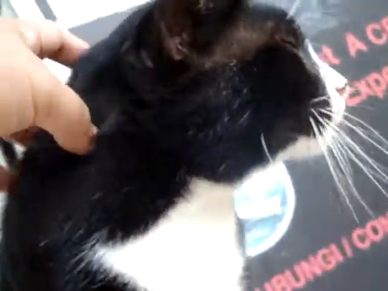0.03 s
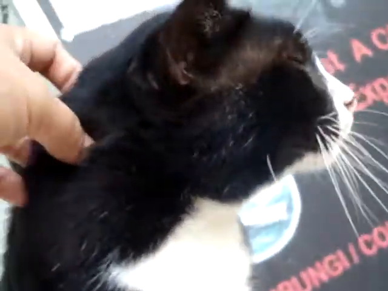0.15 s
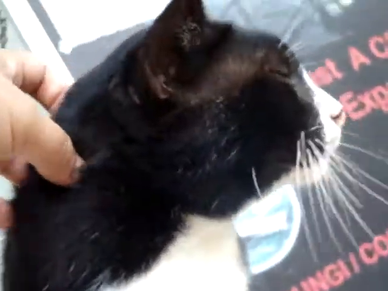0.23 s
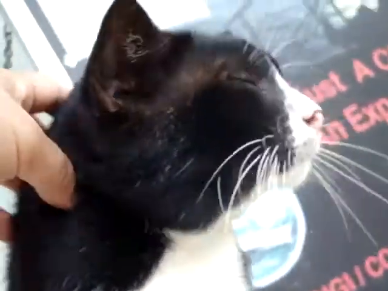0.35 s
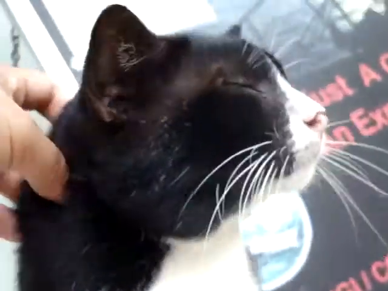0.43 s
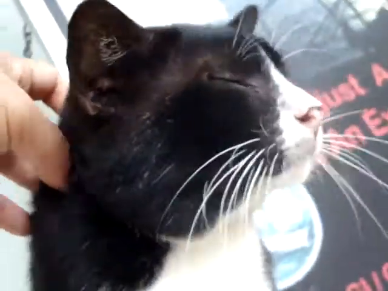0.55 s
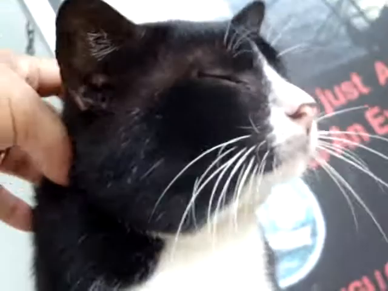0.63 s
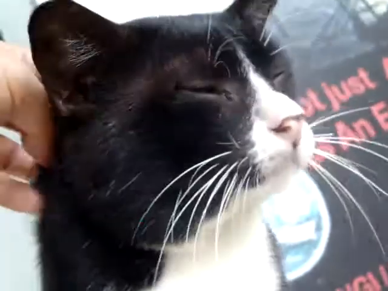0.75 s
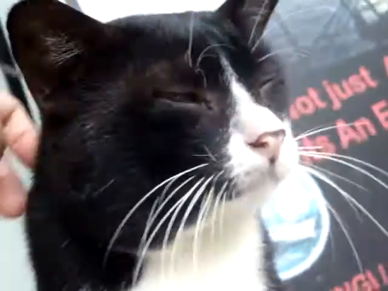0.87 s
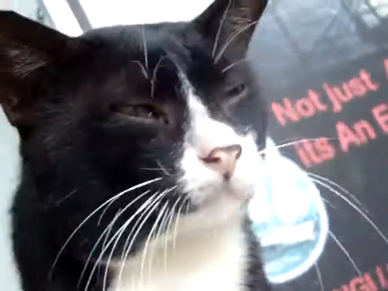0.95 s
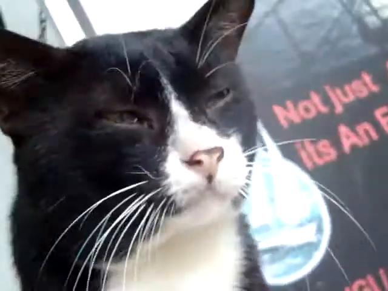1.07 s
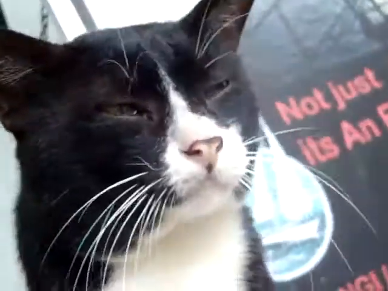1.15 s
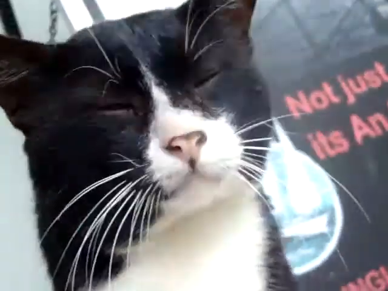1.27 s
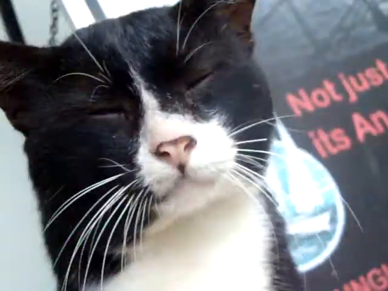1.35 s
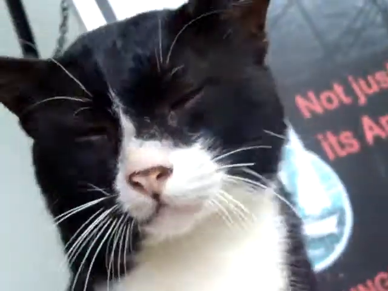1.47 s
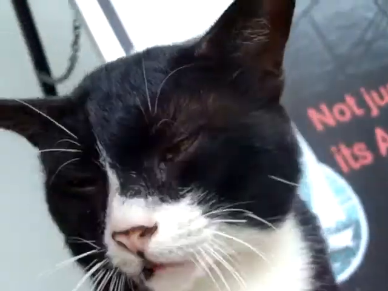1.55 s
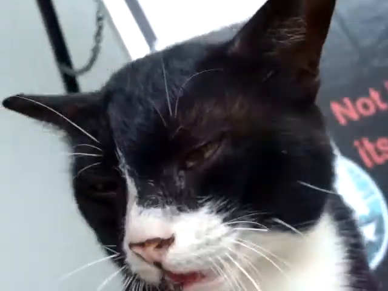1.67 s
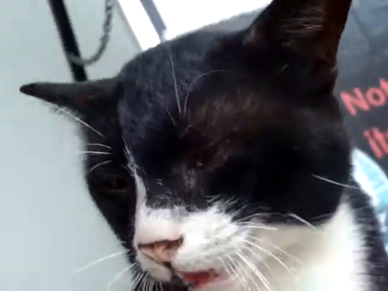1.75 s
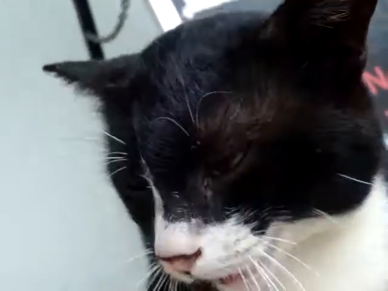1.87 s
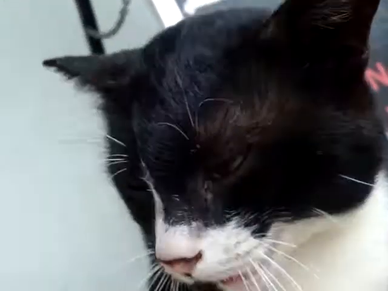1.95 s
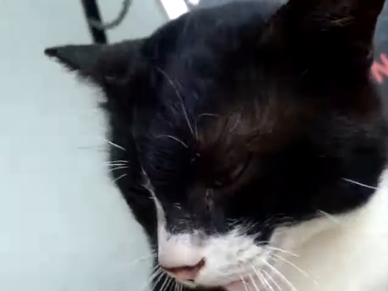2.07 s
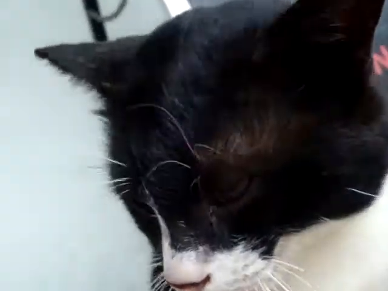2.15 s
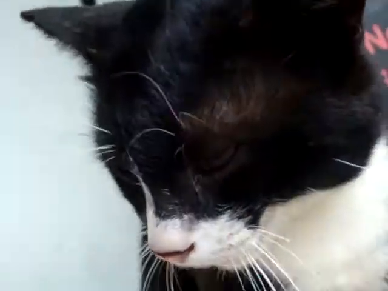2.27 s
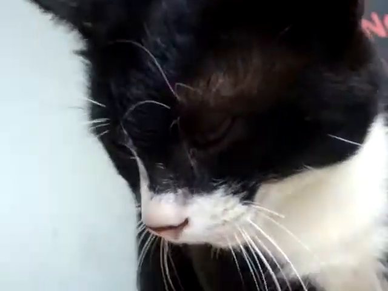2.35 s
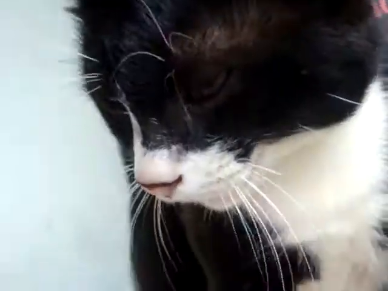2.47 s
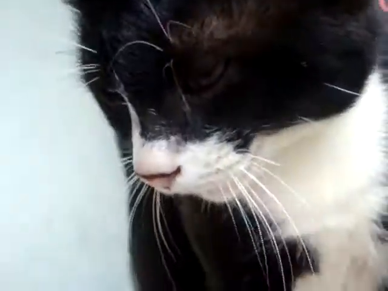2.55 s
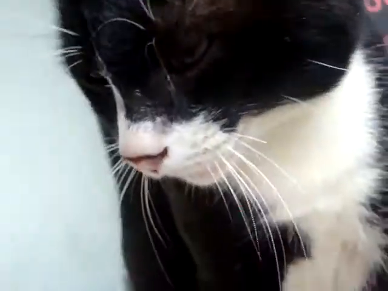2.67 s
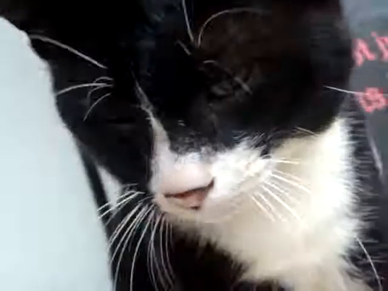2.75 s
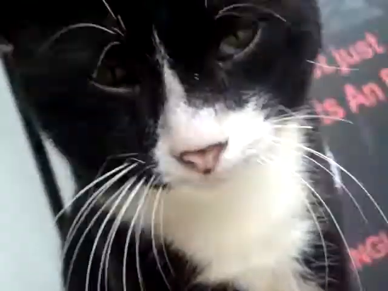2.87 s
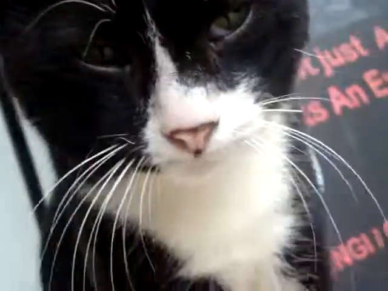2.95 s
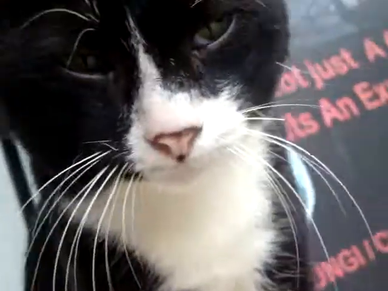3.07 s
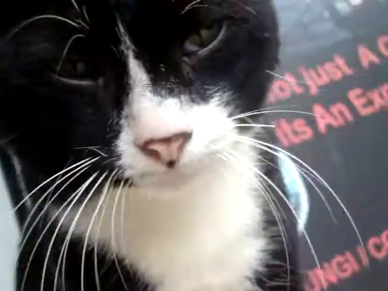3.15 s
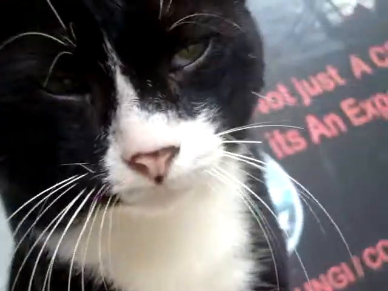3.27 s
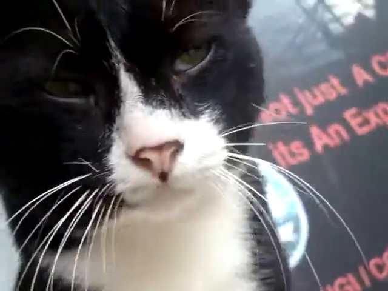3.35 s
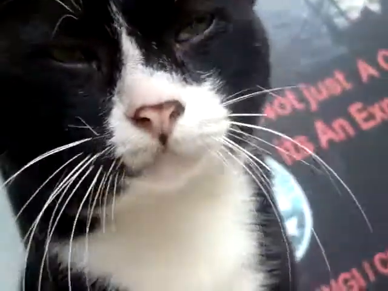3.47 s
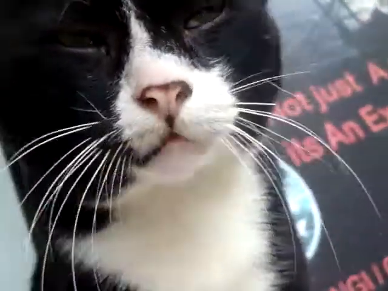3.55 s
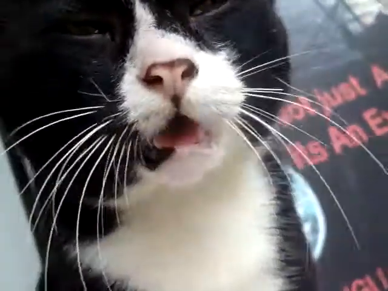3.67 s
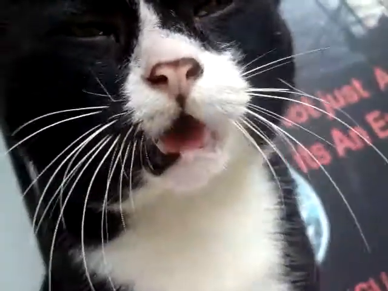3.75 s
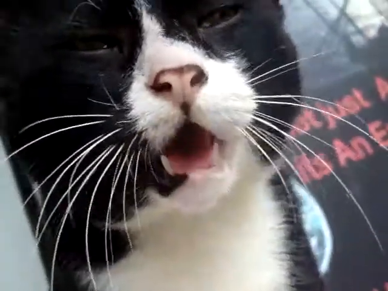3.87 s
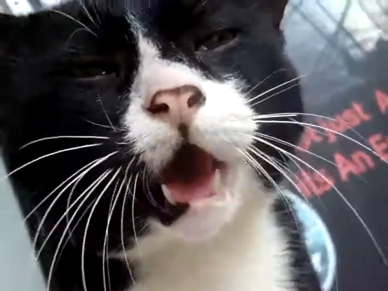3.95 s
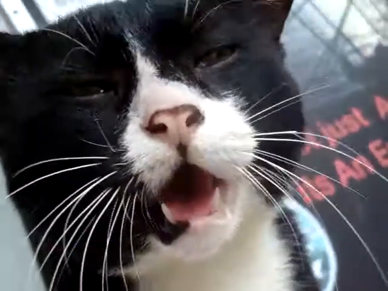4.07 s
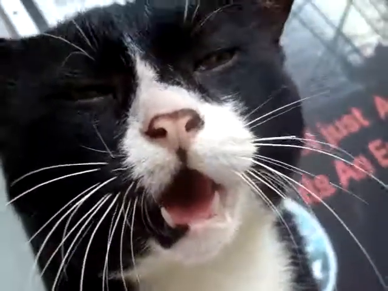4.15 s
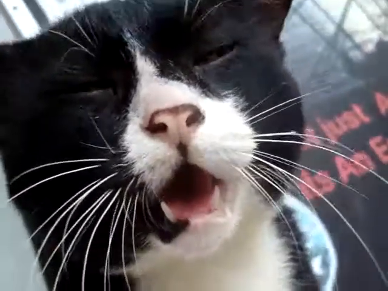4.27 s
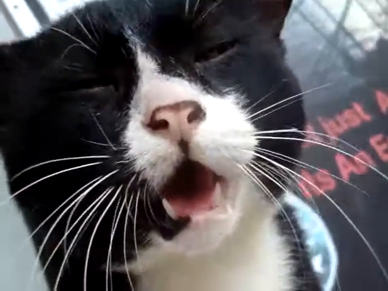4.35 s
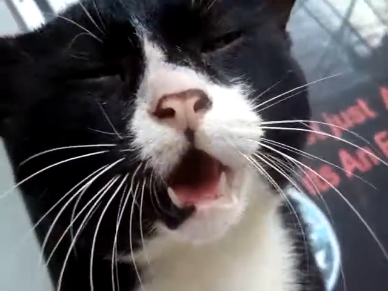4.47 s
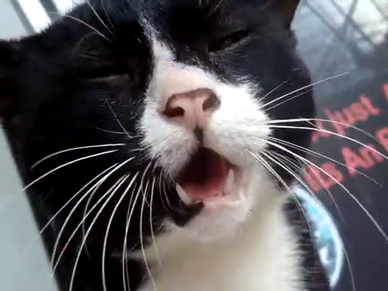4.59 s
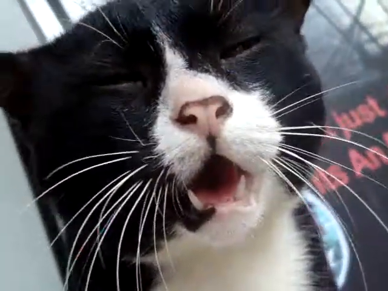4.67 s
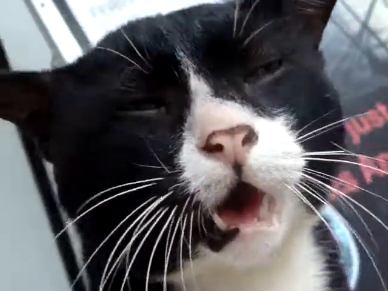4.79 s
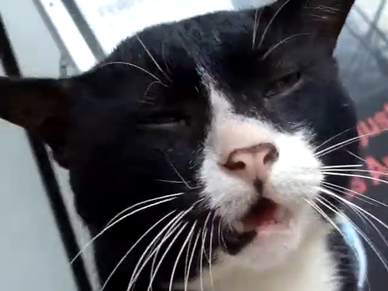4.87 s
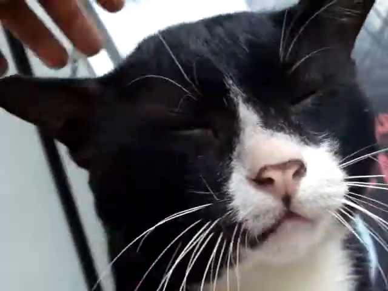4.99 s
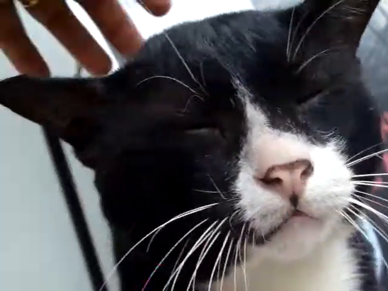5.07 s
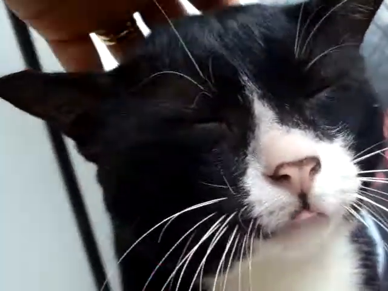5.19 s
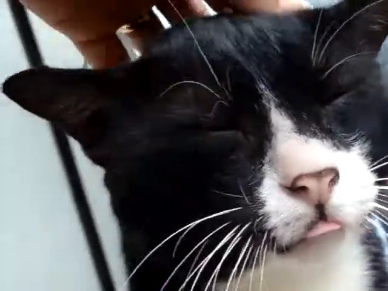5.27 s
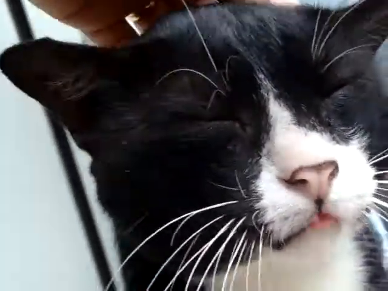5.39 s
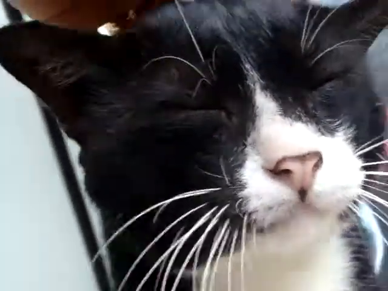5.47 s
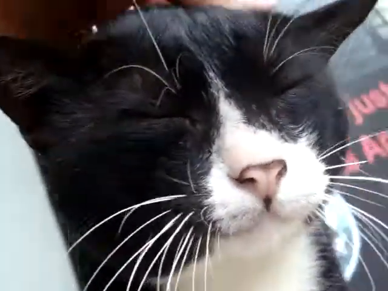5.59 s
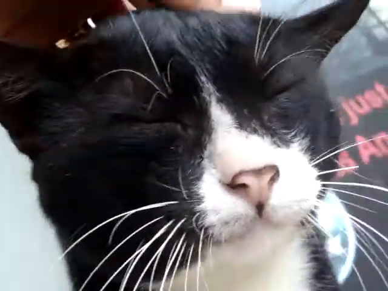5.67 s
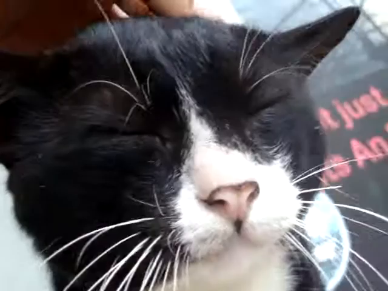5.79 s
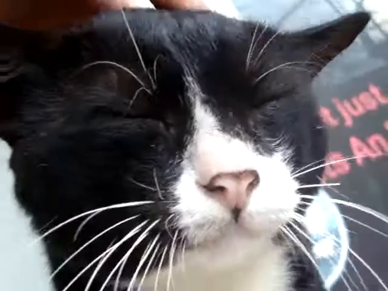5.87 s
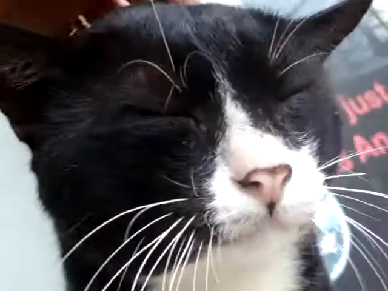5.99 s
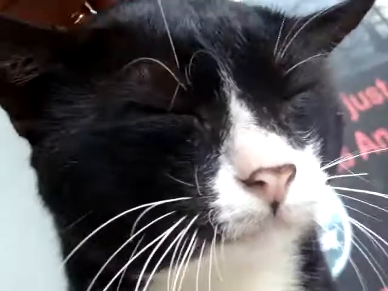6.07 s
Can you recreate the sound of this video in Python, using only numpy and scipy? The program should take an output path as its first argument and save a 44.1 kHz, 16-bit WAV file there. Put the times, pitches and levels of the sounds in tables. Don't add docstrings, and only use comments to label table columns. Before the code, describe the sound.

A cat close by gives two long, plaintive meows beside a street while a small motorbike putters, rolls away, and distant traffic murmurs.

```python
import sys
import numpy as np
from scipy import signal
from scipy.fft import rfft, irfft
from scipy.io import wavfile
from scipy.ndimage import uniform_filter1d

SR = 44100
rng = np.random.default_rng(int(sys.argv[2]) if len(sys.argv) > 2 else 0)


def level_to_linear(level):
    exponent = np.asarray(level, float) / 20
    return 10 ** exponent


def inscribe(sig):
    pcm = np.round(np.clip(np.atleast_2d(sig).T, -1, 1) * 32767)
    wavfile.write(sys.argv[1], SR, pcm.astype(np.int16))


N = 270465

# start in seconds, end in seconds.
CALL_SPANS_S = [
    (1.474, 2.603),
    (3.719, 4.86),
]
BREAK_S, BREAK_GLIDE_S = 3.842, .014


def level(x, db):
    return x * level_to_linear(db) / np.sqrt(np.mean(x ** 2))


def curves(rows):
    s, *columns = np.transpose(rows)
    return [np.interp(np.arange(N) / SR, s, c) for c in columns]


def colour(points, hz):
    f, db = np.transpose(points)
    return np.interp(np.log(hz), np.log(f), db)


def band(x, hz, width_hz):
    return signal.lfilter(*signal.iirpeak(hz, hz / width_hz, SR), x)


def walk(rate_hz):
    hold = int(SR / rate_hz)
    steps = np.repeat(rng.standard_normal(N // hold + 1), hold)
    return 1.557 * uniform_filter1d(uniform_filter1d(steps, hold), hold)[:N]


def traffic():
    # frequency in Hz, density in dB per Hz.
    road_spectrum = [(35, -55.5), (60, -28), (92, -9), (167, -8.5), (207, -8.5), (241, -4.5), (285, -4),
                     (377, -5), (553, -5), (616, -5), (1250, -8.5), (1990, -12.5), (9900, -31),
                     (12900, -89.5), (21800, -120)]
    # strongest at in seconds, half length in seconds, centre in Hz,
    # half width in octaves, change in dB (below 0: a lull).
    passes = [(.38, 0.37, 1600, 3.2, 3.5), (.3, .9, 1320, 1.4, -3.5), (1.93, 0.69, 4800, 1, 4.5),
              (2.1, 0.3, 280, 1.8, 2.5), (4.27, 0.46, 2600, .9, 7.5), (5.07, 0.56, 1440, 0.44, 3.5),
              (5.17, 1.57, 670, 0.95, 4.5), (4.93, 0.28, 1400, 0.44, 2.5), (3.4, .45, 2400, 0.89, -1.5),
              (1.3, 0.21, 700, .8, -1.5)]
    road_db, base_hz, hop = -41, 25, 64
    t = np.arange(0, N, hop) / SR
    freqs_hz = np.fft.rfftfreq(N, 1 / SR)[1:]
    shape = level_to_linear(colour(road_spectrum, freqs_hz))
    out = 0
    for step in range(27):
        octave = step / 3
        place = 3 * np.log2(freqs_hz / base_hz) - step
        window = np.cos(np.pi / 2 * np.clip(place, -1, 1))
        noise = irfft(rfft(rng.standard_normal(N)) * np.append(0, shape * window), N)
        swell_db = 0
        for peak_s, half_s, hz, half_octaves, db in passes:
            distance = (octave - np.log2(hz / base_hz)) / half_octaves
            swell_db = swell_db + db * np.exp(-((t - peak_s) / half_s) ** 2 - distance ** 2)
        flicker_db = 1.1 if 2 ** octave * base_hz < 2500 else .6
        patchy_db = walk(9) * flicker_db + .4 * walk(3)
        out = out + noise * level_to_linear(np.repeat(swell_db, hop)[:N] + patchy_db)
    return out * level_to_linear(road_db) / np.sqrt(np.mean(shape ** 2))


def exhaust_pulses():
    fifth_firings_s = [0.02, 0.342, 0.667, 0.988, 1.303, 1.621, 1.925, 2.239, 2.55, 2.871, 3.192]
    echo_s, echo_db = .0104, -3
    marks_s = np.append(fifth_firings_s, fifth_firings_s[-1] + .32 * np.arange(1, 3))
    times_s = np.interp(np.arange(5 * len(marks_s) - 4) / 5, np.arange(len(marks_s)), marks_s)
    late_s = .0008 * rng.standard_normal(len(times_s))
    uneven_db = .8 * rng.standard_normal(len(times_s))
    pulses = np.zeros(N)
    pulses[((times_s - .004 + late_s) * SR).astype(int)] = level_to_linear(uneven_db)
    return pulses + level_to_linear(echo_db) * np.roll(pulses, int(echo_s * SR))


def motorbike():
    # frequency in Hz, width in Hz, level in dB.
    pipe = [
        (103, 40, 1),
        (215, 50, 1),
        (296, 45, 1),
        (390, 45, -5),
        (570, 60, -13),
    ]
    # level in dB, swing in dB, loudest at in seconds, drift in dB per s,
    # fading in dB per s.
    courses = [
        (-62, 4.5, 1, 2.5, 18),
        (-52, 2, 0.36, -2, 16),
        (-50.5, 1, .27, 1.5, 26),
        (-45.5, 2, 1.1, 1.1, 9),
    ]
    sway_s, leaves_s = 1.19, 2.54
    thump_hz, thump_width_hz = 72.4, 37
    t = np.arange(N) / SR
    heard = exhaust_pulses()
    share = np.sqrt(3.4 * SR / N)

    def ring(hz, width_hz, db):
        return share * level(band(band(heard, hz, width_hz), hz, 2 * width_hz), db)

    modes = [ring(*row) for row in pipe]
    parts = [ring(thump_hz, thump_width_hz, 0), modes[0], modes[1], sum(modes[2:])]
    out = 0
    for part, (db, swing_db, peak_s, drift, fading) in zip(parts, courses):
        swing = swing_db * np.cos(2 * np.pi * (t - peak_s) / sway_s)
        away = fading * np.maximum(t - leaves_s, 0)
        out = out + level_to_linear(db + swing + drift * t - away) * part

    valves_s, near_db, far_db, rise_db_s, fall_db_s = 2.706, -47.5, -72.5, 22, 75
    off_db = np.maximum(rise_db_s * (valves_s - t), fall_db_s * (t - valves_s))
    beat = uniform_filter1d(uniform_filter1d(heard, 500), 500)
    valves = level((1 + 300 * beat) * band(rng.standard_normal(N), 4200, 4500), 0)
    return out + level_to_linear(np.maximum(near_db - off_db, far_db)) * valves


def drones():
    # start in seconds, end in seconds, centre in Hz, width in Hz, level in dB.
    rumbles = [(.2, .65, 555, 70, -52), (.3, .55, 1020, 80, -53), (.9, 1.25, 565, 60, -54),
               (3.05, 3.5, 570, 70, -51), (3.05, 3.3, 375, 50, -52), (4.9, 5.95, 432, 50, -49.5),
               (5.2, 5.8, 660, 100, -52), (4.88, 5.25, 1300, 140, -50), (5.0, 5.5, 1600, 120, -55),
               (5.85, 6.05, 900, 300, -49)]
    t = np.arange(N) / SR
    out = 0
    for start_s, end_s, hz, width_hz, db in rumbles:
        swell = np.sin(np.pi * np.clip((t - start_s) / (end_s - start_s), 0, 1))
        noise = rng.standard_normal(N)
        out = out + swell * level(band(band(noise, hz, width_hz), hz, width_hz), db)
    return out


def catches(column):
    # time in seconds, pitch drop as a share, loss of the ringing overtones in dB (below 0: a rise),
    # half length in seconds.
    bends = [(1.518, .06, 0, 0.00504), (1.529, -.02, -7, .006), (1.545, .055, 1, .005),
             (1.652, 0.0213, 2.5, .006), (1.683, 0, -3.3, 0.036), (1.786, 0.0074, 1.5, .008),
             (1.869, .012, 3, 0.01834), (1.975, 0.014, 2, 0.0085), (2.114, 0.011, 3, 0.0248),
             (2.197, 0, 3, .025), (2.308, .004, 2.2, 0.027), (3.738, -0.0021, -4, 0.022),
             (4.013, 0.009, 0.5, .012), (4.282, .008, -1, .015), (4.36, -0.01, -0.5, .014),
             (4.61, 0, 1, 0.021), (4.742, 0, -1, .035), (1.745, 0, 2.5, .008), (3.721, -0.074, 1, .004),
             (3.808, -0.016, 0, .012), (4.78, -0.0018, -1.5, .01), (4.797, -0.0019, 1.5, .01),
             (2.424, 0, -1, 0.035), (4.15, .006, 0, .02), (4.073, -0.0025, -0.5, .02),
             (1.91, -0.009, -1, .015)]
    t = np.arange(N) / SR
    return sum(row[column] * np.exp(-((t - row[0]) / row[3]) ** 2) for row in bends)


def pitch(register):
    step_up, flip_s, flip_up, flip_glide_s = .081, 4.826, .125, .012
    t = np.arange(N) / SR
    hz, = curves(register)
    before = np.clip(.5 + (BREAK_S - t) / BREAK_GLIDE_S, 0, 1) * (t > CALL_SPANS_S[0][1])
    flipped = np.clip(.5 + (t - flip_s) / flip_glide_s, 0, 1)
    return hz * (1 + step_up * before + flip_up * flipped - catches(1))


def opening(shaping):
    opens_hz, opening_hz = 1560, 200
    mouth_hz = curves(shaping)[1]
    return np.clip((mouth_hz - opens_hz) / opening_hz, 0, 1)


def resonance_db(hz, centre_hz, width_hz):
    return -10 * np.log10((1 - (hz / centre_hz) ** 2) ** 2 + (hz * width_hz / centre_hz ** 2) ** 2)


def overtones_db(hz, shaping):
    # centre in Hz, width in Hz, level in dB.
    leaks = [
        (2532, 320, -13),
        (3520, 200, -20),
    ]
    nose_hz, nose_width_hz, notch_width_hz = 1466.5, 148, 14
    mouth_width_hz, pharynx_width_hz, fundamental_db = 284, 1176, -7.5
    effort_db, mouth_hz, tilt_db_octave = curves(shaping)
    pharynx_hz = 2740 - .16 * (mouth_hz - 2200)
    k = np.arange(1, 6)[:, None]
    tone_hz = k * hz
    tract_db = resonance_db(tone_hz, mouth_hz, mouth_width_hz)
    tract_db = tract_db + resonance_db(tone_hz, pharynx_hz, pharynx_width_hz)
    nose_db = resonance_db(tone_hz, nose_hz, nose_width_hz) - resonance_db(tone_hz, nose_hz, notch_width_hz)
    folds_db = tilt_db_octave * np.log2(k) + fundamental_db * (k == 1)
    through = level_to_linear(folds_db + tract_db + nose_db) ** 2
    leak = sum(level_to_linear(db) ** 2 / (1 + ((tone_hz - f) / width) ** 4) for f, width, db in leaks)
    leak = leak * np.where(k > 4, opening(shaping) ** 2, 1)
    return effort_db + 10 * np.log10(through + leak) - catches(2) * (k > 2)


def meow(span_s, register, shaping, early, late):
    onset_s, release_s = .006, .025
    jitter, waver, shimmer_db = .0018, .002, .3
    throat_gain_db, patchy_db, tiring_db_s = -10.5, .3, 5
    rasp_db, high_rasp_db = -24.5, 33
    t = np.arange(N) / SR
    hz = pitch(register)
    voiced = np.clip(np.minimum((t - span_s[0]) / onset_s, (span_s[1] - t) / release_s), 0, 1)
    phase = 2 * np.pi * np.cumsum(hz * (1 + jitter * walk(250) + waver * walk(40))) / SR

    low_db = overtones_db(hz, shaping)
    effort = np.sqrt(level_to_linear(low_db[2]) ** 2 + level_to_linear(low_db[3]) ** 2)
    gains = [level_to_linear(db + shimmer_db * walk(40)) for db in low_db]
    high_gain = opening(shaping) * (10 * effort) ** .48
    unbroken = t < BREAK_S + BREAK_GLIDE_S
    for k in range(6, 17):
        tired_db = colour(late, k * hz) - tiring_db_s * (t - BREAK_S)
        throat_db = np.where(unbroken, colour(early, k * hz), tired_db)
        flutter_db = patchy_db * (k - 4) * walk(14) + 1.8 * walk(200)
        gains.append(high_gain * level_to_linear(throat_db + throat_gain_db + flutter_db))

    tones = 0
    for k, gain in enumerate(gains, 1):
        turn = 1 + 4.5 * (k - 3) if k > 2 else 0
        tones = tones + gain * np.sqrt(2) * np.cos(k * phase + turn)

    air = rng.standard_normal(N) * (1 + .5 * np.cos(phase))
    rasp = level(band(band(air, 2300, 870), 2400, 1000), 0)
    for f in (5700, 9400):
        rasp = rasp + level(band(band(air, f, 1200), f, 1500), high_rasp_db + colour(late, f))
    return voiced * (tones + level_to_linear(rasp_db) * effort * rasp)


def wall_tail(voice):
    wall_db, t60_s, gap_s = -27, .14, .004
    t = np.arange(int(.3 * SR)) / SR
    tail = band(rng.standard_normal(len(t)), 2800, 3700) * 1000. ** (-t / t60_s) * (t > gap_s)
    return level_to_linear(wall_db) * signal.fftconvolve(voice, tail / np.sqrt(np.sum(tail ** 2)))[:N]


def scene():
    # time in seconds, pitch in Hz.
    first_pitch = [(1.48, 660.5), (1.512, 635.5), (1.564, 691.5), (1.672, 721.0), (1.696, 698.0),
                   (1.716, 707.0), (2.008, 723.5), (2.528, 692.0), (2.596, 661.0)]
    second_pitch = [(3.728, 637.3), (3.74, 629.9), (3.792, 645.2), (3.92, 623.0), (4.084, 620.5),
                    (4.196, 599.5), (4.348, 608.5), (4.596, 586.0), (4.856, 580.0)]
    # time in seconds, effort in dB, mouth resonance in Hz,
    # fold tilt in dB per octave.
    first_mouth = [(1.48, -41.5, 1326.0, -13), (1.565, -33.5, 1360, -7), (1.726, -34, 1930, -6.5),
                   (1.795, -35, 2410, -3.5), (1.857, -34.5, 2481.0, -3.5), (2.016, -33.5, 2340, -5.0),
                   (2.252, -37, 2324.0, -6.5), (2.524, -36.5, 2310, -8.5), (2.6, -38, 2170, -17)]
    second_mouth = [(3.73, -28, 1680, -16), (3.813, -29.8, 2346, -3.5), (3.844, -30, 2283, -5.5),
                    (4.088, -30.5, 2486, -7.0), (4.348, -29.0, 2615, -6.5), (4.538, -30, 2350, -7),
                    (4.781, -31.9, 2234, -7.5), (4.807, -33, 2340, -10), (4.859, -30.5, 2097.0, -15)]
    # frequency in Hz, level in dB.
    throats = [
        [(3900, -46), (4400, -47), (5050, -40), (5700, -55), (7000, -66), (10000, -75)],
        [(3900, -54), (4900, -51), (5550, -42), (6250, -42), (6900, -62), (10000, -72)],
        [(3700, -35), (4200, -43), (4800, -45), (5600, -40), (6300, -43.5), (7000, -59), (8000, -67),
         (9500, -58)],
    ]
    voice = meow(CALL_SPANS_S[0], first_pitch, first_mouth, throats[0], throats[0])
    voice = voice + meow(CALL_SPANS_S[1], second_pitch, second_mouth, throats[1], throats[2])
    return (voice + wall_tail(voice) + motorbike() + traffic() + drones())[None]


def roll_off(x):
    return signal.sosfilt(signal.butter(12, 10050, fs=SR, output="sos"), x)


def record(dry):
    high_pass = signal.butter(4, 85, "high", fs=SR, output="sos")
    low_pass = signal.ellip(10, .2, 70, 10080, fs=SR, output="sos")
    rumble = level(band(rng.standard_normal(N), 35, 60), -76)
    mix = signal.sosfilt(low_pass, signal.sosfilt(high_pass, dry) + rumble)
    return roll_off(mix)


dry = scene()
out = record(dry)
inscribe(out)
```